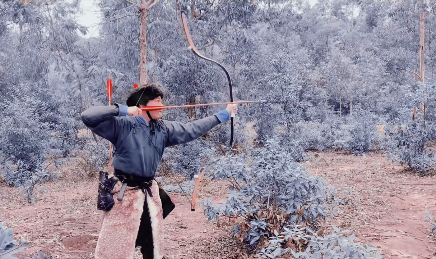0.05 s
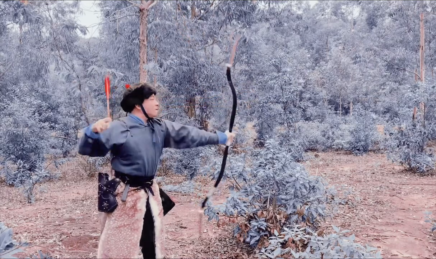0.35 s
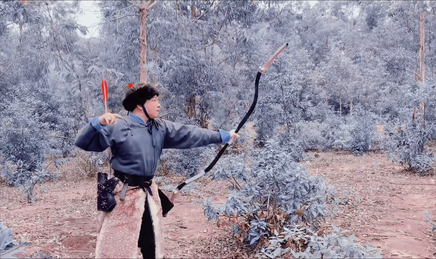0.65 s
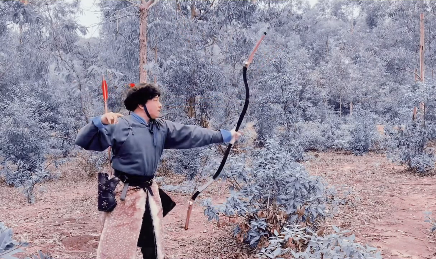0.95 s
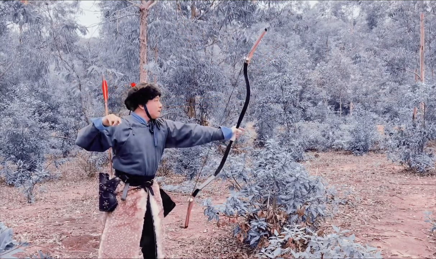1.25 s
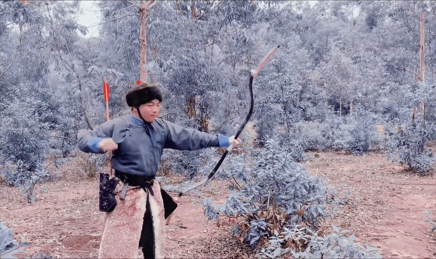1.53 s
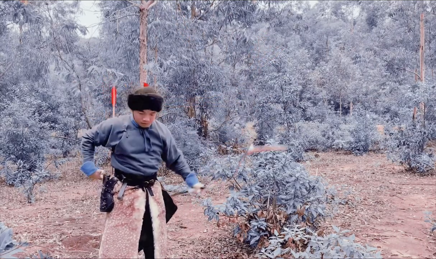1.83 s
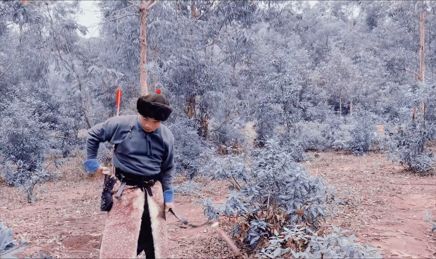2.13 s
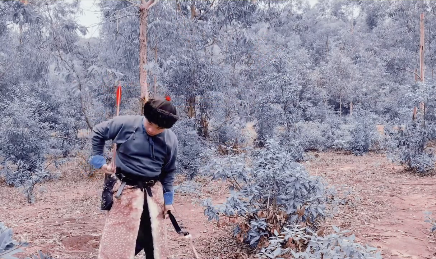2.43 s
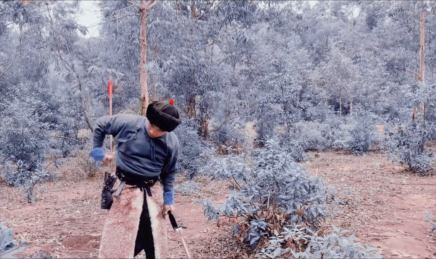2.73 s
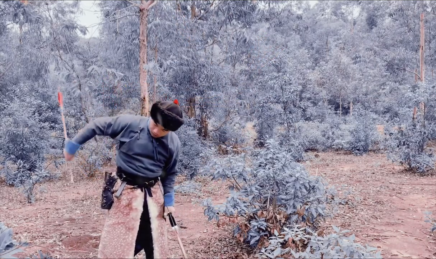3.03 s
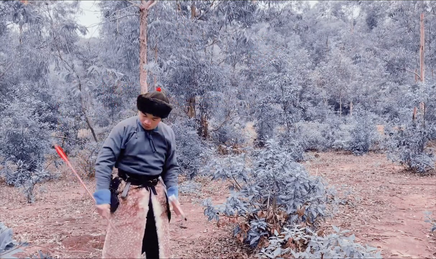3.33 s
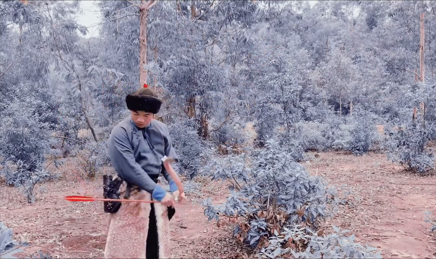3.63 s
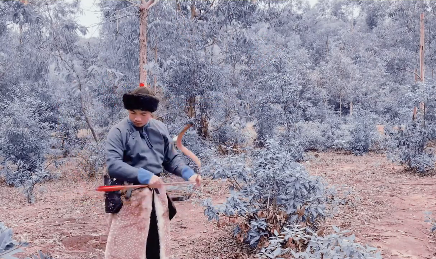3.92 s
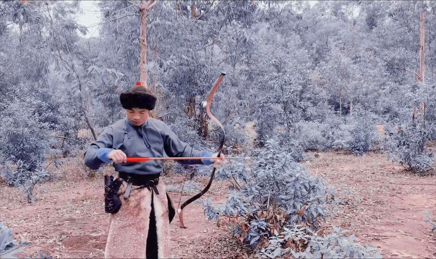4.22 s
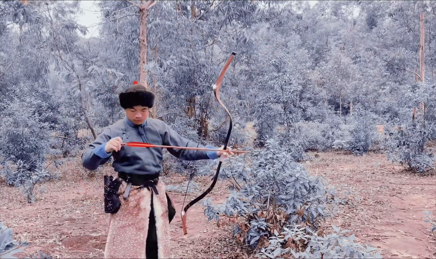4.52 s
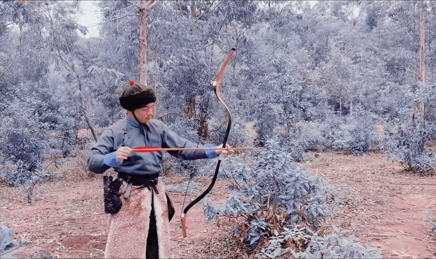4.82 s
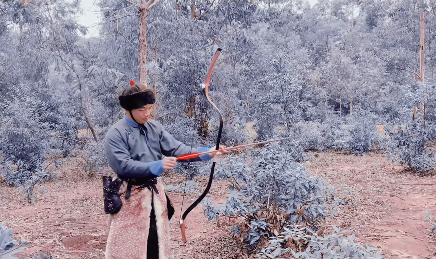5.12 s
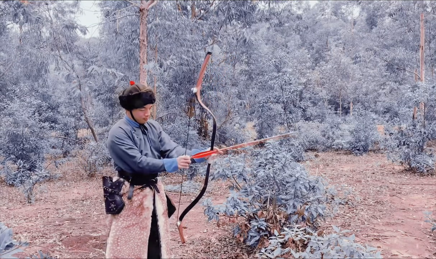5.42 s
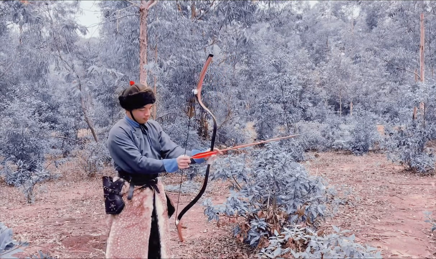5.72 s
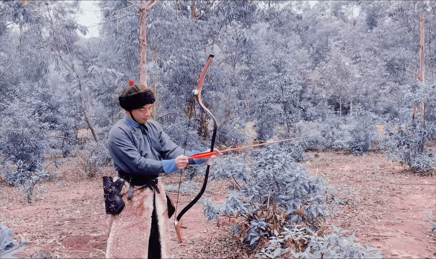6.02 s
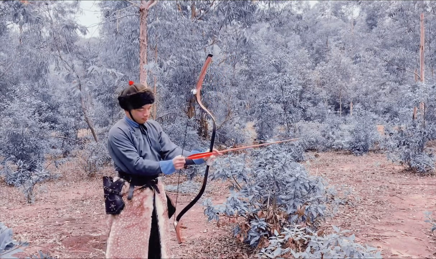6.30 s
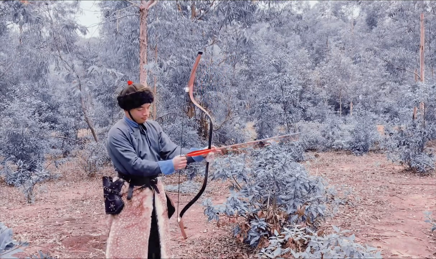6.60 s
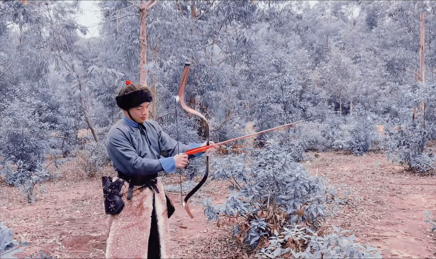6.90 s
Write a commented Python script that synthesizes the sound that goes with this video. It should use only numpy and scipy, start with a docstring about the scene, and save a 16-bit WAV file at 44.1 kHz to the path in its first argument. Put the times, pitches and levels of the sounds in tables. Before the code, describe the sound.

A heavy bow releases with a loud, sharp string crack, and half a second later the arrow thuds into a target. After some faint clothing scuffs, the next arrow is drawn from a quiver and slid along the bow with light taps, scrapes and tiny squeaks. The bow sounds fairly near the microphone, with a short forest echo, a low outdoor rumble and one barely audible bird.

```python
"""A heavy bow shot in a forest clearing: the string drives the arrow, cracks taut and rings the limbs.
Half a second later the point tears into the target, which thuds and booms on its stand.
The archer pulls the next arrow from the quiver, slides it along the bow and fingers the feathers:
taps ring the shaft, friction hisses and squeaks. The trees scatter all of this back.
Underneath: a low outdoor rumble, a faint 3 kHz blip between shot and hit, and one far bird."""
import sys
import numpy as np
from scipy import signal
from scipy.fft import rfft, irfft, next_fast_len
from scipy.io import wavfile
from scipy.ndimage import uniform_filter1d

SR = 44100
rng = np.random.default_rng(int(sys.argv[2]) if len(sys.argv) > 2 else 0)


def inscribe(sig):
    """Save sig as 16-bit PCM at rate SR to the path in sys.argv[1].

    A 1-D sig is mono; a 2-D sig holds one channel per row.
    Samples are clipped to [-1, 1] before scaling.
    """
    pcm = np.round(np.clip(np.atleast_2d(sig).T, -1, 1) * 32767)
    wavfile.write(sys.argv[1], SR, pcm.astype(np.int16))


N = 310949
TIME_S = np.arange(N) / SR
LOOSE_S, TAUT_S, IMPACT_S, QUIVER_S = .2138, .2378, .7153, 3.294

# Noise spectra. Each row: frequency in Hz, relative level in dB.
AIR_SPECTRUM = [(15, -55.5), (25, -24), (35, -9.5), (52, 1), (75, 0), (134, -12), (256, -27), (420, -35),
                (720, -35.5), (1040, -41.5), (1300, -50), (2900, -55.5), (6700, -63), (11400, -59.5),
                (16000, -74)]
CREAK_SPECTRUM = [(1500, -35), (2700, -2), (3200, 0), (4500, -7), (7000, -20), (16000, -30)]
THRUST_SPECTRUM = [(88, -40), (250, -12), (620, -3), (1050, -3.5), (1480, -17), (2200, -11.5), (2550, -15),
                   (3500, -10.5), (5400, -22), (7400, -18), (12000, -20), (16000, -21)]
SLAP_SPECTRUM = [(88, -29), (160, -8.5), (260, -2.5), (430, -14), (650, -5.5), (1100, -9), (2100, -2.5),
                 (2550, -7.5), (3450, 0.5), (4300, -3), (4700, -10), (6900, -8), (9500, -15), (12300, -5.5),
                 (15500, -12.5)]
TEAR_SPECTRUM = [(350, -10.5), (600, 3), (1000, -4.5), (1850, -20.5), (3600, -15), (4800, -24), (6200, -21),
                 (8500, -25.5), (12000, -28), (16000, -36)]
SLEEVE_SPECTRUM = [(590, -57), (1000, -4.5), (1680, -6.5), (2890, -7.5), (3630, -27), (7210, -18),
                   (9160, -30), (12000, -15.5), (15600, -46), (22000, -120)]
TAP_SPECTRUM = [(150, -33), (380, 9), (650, -7), (1380, -1.5), (2000, -5), (2750, -5.5), (3600, -13.5),
                (4500, -15), (8000, -21), (16000, -31.5)]
SHUFFLE_SPECTRUM = [(150, -13), (330, 4), (650, 1), (1000, -9), (1500, -20.5), (4000, -40.5)]
BRUSH_SPECTRUM = [(1500, -23), (3000, -10.5), (5000, -8), (7000, 4.5), (8500, -1), (11500, 5.5),
                  (13000, -0.5), (15500, 0.5)]
PULL_SPECTRUM = [(700, -15), (1300, -8.5), (2200, -1), (3000, -1), (4400, -0.5), (5100, -14), (8000, -26),
                 (11000, -37)]
RUB_SPECTRUM = [(200, -4), (400, 1.5), (750, 1.5), (1200, 2.5), (2200, 0), (3200, -4.5), (4500, -7.5),
                (6000, -26), (9000, -24)]
FEATHER_SPECTRUM = [(1500, -45), (2300, -13), (3000, -4), (5000, -2.5), (7500, -6), (11000, 0.5),
                    (13000, -5.5), (15500, -4.5)]

# Struck modes. Each row: frequency in Hz, relative level in dB, T60 in seconds.
BOW_MODES = [(160, -41.5, 0.51), (249, -22, 0.066), (651, -28.5, 0.15), (848, -30, .1), (1122, -32.5, .08),
             (1284, -30, 0.065), (2300, -24, .03), (2665, -27, .05), (3380, -21, 0.043), (3562, -23, .045),
             (4272, -20, 0.044)]  # limbs and taut string
TARGET_MODES = [(112.4, -22.5, 0.17), (172, -20.5, 0.14), (226, -22, 0.11), (271, -24, 0.1),
                (385, -28, 0.113), (726, -36, 0.043), (986, -39, 0.072)]  # target and stand
QUIVER_MODES = [(1120, -60, 0.044), (1341, -50, 0.054), (1565, -52, .04)]
# Shaft bending modes. Each row: frequency in Hz, width in Hz, relative level in dB.
SHAFT_MODES = [(436, 140, -9.5), (966, 120, -4.5), (1353, 66, 3), (1813, 50, -1.5), (2194, 86, -6),
               (2805, 24, 0), (3040, 81, -14.5), (3810, 58, -14), (4605, 54, -20)]

# String and arrow on the bow. Each row: start in seconds, relative level in dB, T60 in seconds,
# treble gain in dB.
SLAPS = [(0.2184, -24, 0.008, 2), (0.233, -21, 0.037, 2), (0.2347, -18, .025, 0), (0.2374, -9, 0.01, -3),
         (0.2385, -12.5, 0.0085, 6), (0.2398, -8.5, 0.01, -3), (0.2429, -13, 0.0071, 1),
         (.2452, -19, 0.05, -4.5), (0.2486, -22, 0.0091, 9.5)]
# Arrow on quiver, fingers and bow. Each row: start in seconds, relative level in dB, treble gain in dB.
ARROW_TAPS = [(1.667, -63, 0), (2.014, -49.5, -12), (3.012, -67, 9), (3.293, -42.5, 7), (3.382, -52, -4),
              (3.691, -36, 3.5), (3.831, -44.5, 1.5), (4.459, -54.5, 2), (4.767, -52.5, 0),
              (4.854, -43, -6), (5.063, -42, 9.5), (5.073, -42.5, 9), (5.255, -43, 9.5),
              (5.297, -43.5, -11), (5.507, -59.5, 1), (6.267, -58, 1.5), (6.647, -53, 6.5),
              (6.81, -52.5, -6)]

# Gestures. Each row: start and length in seconds, relative level in dB, attack and release in seconds,
# sag in dB per second.
SLEEVE_SWING = [(1.42, .82, -79.5, 0.27, .18, 1)]
BIRD_WHISTLE = [(3.17, .49, -83, 0.088, .12, 8)]
HAND_STROKES = [(3.78, 0.27, -63, 0.11, 0.021, 0.5), (4.013, 0.36, -47.5, 0.013, 0.086, 59),
                (4.8, 0.548, -59.5, 0.23, 0.023, 8)]  # feel along the shaft, pull, push to the string
QUICK_PULL = [(4.033, 0.25, -50, 0.018, .07, 75)]
BOW_RUBS = [(4.775, 0.486, -54.5, 0.19, .05, 8), (5.262, 0.079, -58.5, 0.026, .02, 0)]  # slide, then a last catch
FEATHER_STROKE = [(5.777, 0.24, -64, .012, 0.047, -1)]

# Noise swells. Each row: centre in seconds, relative level in dB, half length in seconds.
RUSTLE_FLICKS = [(0.099, -71, 0.008), (1.76, -77, .009), (3.297, -76, .016), (3.89, -65, 0.0092),
                 (4.352, -65, .0031), (4.635, -74, .0025), (5.314, -56, .011), (5.428, -71, 0.013),
                 (5.559, -77, .012), (5.79, -65, 0.0049), (6.1, -69, 0.0068), (6.597, -79.5, .011),
                 (6.697, -79, .008), (6.974, -73.5, .0086), (7.035, -72.5, 0.0083)]
STRING_CREAK = (.103, -66, .003)  # one bare row
SCUFFS = [(1.68, -66.5, 0.014), (1.769, -62.5, 0.02), (2.02, -63, 0.026), (2.585, -69.5, 0.057),
          (2.763, -66, 0.0089), (5.457, -70, 0.027), (5.675, -68, 0.022), (6.271, -62, 0.013),
          (6.657, -61, 0.016), (6.806, -71.5, 0.034)]
# Tone swells. Each row: centre in seconds, pitch in Hz, relative level in dB, half length in seconds.
FAINT_TONES = [(.561, 2980, -61.5, 0.011), (1.057, 3755, -83, 0.018), (1.828, 3350, -83, .025),
               (1.98, 3090, -79.5, 0.025), (2.79, 3480, -86, .027), (2.91, 2920, -85.5, .04)]  # first row: blip between shot and hit; the rest: bird chirps
FINGER_SQUEAKS = [(4.995, 1170, -48.5, 0.008), (5.022, 1940, -54, 0.0087), (5.092, 1160, -58, .0073),
                  (5.116, 2900, -59.5, 0.009), (5.163, 1520, -50, 0.0098), (5.9, 3050, -53.5, 0.0017)]

# Tree echo spectrum. Each row: frequency in Hz, gain in dB.
ECHO_SPECTRUM = [(100, -22), (250, -23.5), (700, -24), (1500, -21), (3000, -19), (6000, -14.5),
                 (11000, -19), (16000, -19.5)]
# Tree echo decay. Each row: frequency in Hz, T60 in seconds.
ECHO_T60_S = [(100, .55), (700, .55), (2000, .7), (4000, .68), (7000, .56), (12000, .48), (16000, .42)]
# Output stop bands. Each row: centre in Hz, width in Hz.
NOTCHES_HZ = [(9150, 1000), (13580, 900)]


def from_db(db):
    """Decibels to gain."""
    return 10 ** (np.asarray(db) / 20)


def unit_rms(x):
    """Scale to unit power."""
    return x / np.sqrt(np.mean(x ** 2) + 1e-20)


def at_hz(table, hz):
    """Interpolate on a log-frequency axis."""
    table = np.array(table)
    return np.interp(np.log(np.maximum(hz, 1)), np.log(table[:, 0]), table[:, 1])


def colour(x, spectrum):
    """Filter by a spectrum; RMS 1."""
    half_size = next_fast_len(N // 2 + 1)
    gain = from_db(at_hz(spectrum, np.linspace(0, SR / 2, half_size + 1)))
    return unit_rms(irfft(rfft(x, 2 * half_size) * gain)[:N])


def noise(spectrum):
    """Coloured noise; RMS 1."""
    return colour(rng.standard_normal(N), spectrum)


def steady(x, span_s):
    """Flatten short-term power."""
    power = uniform_filter1d(x * x, int(span_s * SR))
    return x / np.sqrt(np.maximum(power, 1e-12))


def split(x, edge_hz):
    """Parts below and above an edge."""
    low = signal.sosfiltfilt(signal.butter(2, edge_hz, fs=SR, output="sos"), x)
    return low, x - low


def butter(x, order, edges_hz, kind):
    """Causal Butterworth filter."""
    return signal.sosfilt(signal.butter(order, edges_hz, kind, fs=SR, output="sos"), x)


def drift(rate_hz):
    """Random wander, spread about 1."""
    return np.interp(TIME_S * rate_hz, np.arange(N // 10), rng.standard_normal(N // 10))


def friction(grain_db):
    """Grainy white noise: fibres catch and let go."""
    return unit_rms(rng.standard_normal(N) * from_db(grain_db * (drift(600) + drift(90)) / 2))


def gesture_gain(gestures):
    """Envelopes that rise, sag steadily and stop."""
    gain = 0
    for start_s, length_s, db, attack_s, release_s, sag_db_per_s in gestures:
        age_s = TIME_S - start_s
        gate = np.clip(age_s / attack_s, 0, 1) * np.clip((length_s - age_s) / release_s, 0, 1)
        gain += gate * from_db(db - sag_db_per_s * np.clip(age_s - attack_s, 0, length_s))
    return gain


def decay(start_s, t60_s):
    """Instant onset, exponential fall."""
    age_s = TIME_S - start_s
    return (age_s >= 0) * from_db(-60 * np.clip(age_s / t60_s, 0, 4))


def swell(centre_s, db, half_s):
    """Gaussian envelope."""
    return from_db(db) * np.exp(-np.minimum(((TIME_S - centre_s) / half_s) ** 2 / 2, 50))


def struck(start_s, modes):
    """Damped sines from one blow."""
    return sum(from_db(db) * decay(start_s, t60_s) * np.sin(2 * np.pi * hz * (TIME_S - start_s))
               for hz, db, t60_s in modes)


def running_phase(start_s, hz):
    """Integrate pitch to radians."""
    return 2 * np.pi * np.cumsum(hz * (TIME_S >= start_s)) / SR


def sinking_phase(start_s, from_hz, to_hz, sink_s):
    """Phase of an exponentially settling pitch."""
    age_s = np.maximum(TIME_S - start_s, 0)
    return running_phase(start_s, to_hz + (from_hz - to_hz) * np.exp(-age_s / sink_s))


def blurred(phase, rate_hz):
    """Tone spread to a narrow band by wandering gain and phase."""
    return drift(rate_hz) * np.sin(phase) + drift(rate_hz) * np.cos(phase)


def tone_swell(centre_s, hz, db, half_s):
    """Brief blurred tone."""
    return swell(centre_s, db, half_s) * blurred(2 * np.pi * hz * TIME_S, rate_hz=350)


def outdoor_air(level_db=-49.5, waver_db=1.5):
    """Rumble and faint hush; each lower band wavers on its own."""
    rest, wavering = noise(AIR_SPECTRUM), 0
    for edge_hz in (200, 400, 800, 1600, 3200):
        band, rest = split(rest, edge_hz)
        wavering += band * from_db(waver_db * drift(rate_hz=9))
    return from_db(level_db) * (wavering + rest)


def rustles():
    """Cloth and feather barbs give grainy hiss."""
    flicks = sum(swell(*row) for row in RUSTLE_FLICKS) * colour(friction(grain_db=1.5), BRUSH_SPECTRUM)
    sleeve = gesture_gain(SLEEVE_SWING) * colour(friction(grain_db=5), SLEEVE_SPECTRUM)
    feathers = gesture_gain(FEATHER_STROKE) * colour(friction(grain_db=7), FEATHER_SPECTRUM)
    return flicks + sleeve + feathers


def string_creak():
    """Fingers scrape the drawn string."""
    return swell(*STRING_CREAK) * noise(CREAK_SPECTRUM)


def string_thrust(level_db=-27.5, attack_s=.005, hold_s=.031, t60_s=.125):
    """The string drives the arrow past the grip: a rush that holds, then dies."""
    age_s = TIME_S - LOOSE_S
    envelope = np.clip(age_s / attack_s, 0, 1) * from_db(-60 * np.clip((age_s - hold_s) / t60_s, 0, 2))
    return from_db(level_db) * envelope * steady(noise(THRUST_SPECTRUM), span_s=.008)


def string_crack(slap_db=-1, ring_db=-.5):
    """The string snaps taut in a cluster of slaps; the limbs ring on."""
    low_power = high_power = 0
    for start_s, db, t60_s, treble_db in SLAPS:
        envelope = from_db(db) * decay(start_s, t60_s)
        low_power += envelope ** 2
        high_power += (envelope * from_db(treble_db)) ** 2
    low, high = split(steady(noise(SLAP_SPECTRUM), span_s=.002), edge_hz=4900)
    slaps = np.sqrt(low_power) * low + np.sqrt(high_power) * high
    return from_db(slap_db) * slaps + from_db(ring_db) * struck(TAUT_S, BOW_MODES)


def forest_echoes(x, build_s=.0056):
    """Dense scatter off trunks and leaves; each band has its own decay."""
    edges_hz = np.geomspace(70, 17000, 13)
    age_s = TIME_S[:SR]
    white = rng.standard_normal((2, SR))
    response = 0
    for k, (low_hz, high_hz) in enumerate(zip(edges_hz, edges_hz[1:])):
        hz = np.sqrt(low_hz * high_hz)
        fade = (1 - np.exp(-age_s / build_s)) * from_db(-60 * age_s / at_hz(ECHO_T60_S, hz))
        band = butter(white[k % 2], 2, [low_hz, high_hz], "band")
        response += from_db(at_hz(ECHO_SPECTRUM, hz)) * band * fade / np.linalg.norm(fade)
    return signal.fftconvolve(x, response)[:N]


def faint_blip():
    """Short, faint 3 kHz blip between the shot and the target hit."""
    return tone_swell(*FAINT_TONES[0])


def target_tear(level_db=-25, entry_s=.0044):
    """The point tears in: a short noise burst."""
    envelope = np.clip((TIME_S - IMPACT_S) / entry_s, 0, 1) * decay(IMPACT_S, t60_s=.061)
    return from_db(level_db) * envelope * steady(noise(TEAR_SPECTRUM), span_s=.0032)


def target_thud(punch_db=-18, peak_s=.011, sharpness=2.9, stand_db=-4.5, give_s=.0085):
    """Pitch falls as more of the target moves; then the stand booms."""
    progress = np.clip((TIME_S - IMPACT_S) / peak_s, 0, 20)
    envelope = (progress * np.exp(1 - progress)) ** sharpness
    punch = envelope * np.sin(sinking_phase(IMPACT_S, from_hz=1445, to_hz=192, sink_s=.003197))
    return from_db(punch_db) * punch + from_db(stand_db) * struck(IMPACT_S + give_s, TARGET_MODES)


def far_bird(whistle_hz=4500, fall_hz_per_s=1450, flutter_db=3):
    """Chirps and a falling whistle, blurred by many paths through the leaves."""
    chirps = sum(tone_swell(*row) for row in FAINT_TONES[1:])
    start_s = BIRD_WHISTLE[0][0]
    phase = running_phase(start_s, whistle_hz - fall_hz_per_s * (TIME_S - start_s))
    whistle = gesture_gain(BIRD_WHISTLE) * blurred(phase, rate_hz=260)
    return chirps + whistle * from_db(flutter_db * drift(rate_hz=25))


def shaft_ring(force):
    """Force through the arrow's bending modes, alternating in sign."""
    ring = 0
    for k, (hz, width_hz, db) in enumerate(SHAFT_MODES):
        radius = np.exp(-np.pi * width_hz / SR)
        feedback = [1, -2 * radius * np.cos(2 * np.pi * hz / SR), radius ** 2]
        gain = (-1) ** k * from_db(db) * (1 - radius ** 2) / 2
        ring += gain * signal.lfilter([1, 0, -1], feedback, force + 1e-18)
    return ring


def arrow_taps(click_db=-9, ring_db=7.5, t60_s=.054):
    """Each touch rattles briefly and rings the shaft."""
    force = sum(from_db(db) * decay(start_s, t60_s) for start_s, db, _ in ARROW_TAPS)
    bright = sum(from_db(db + treble_db) * decay(start_s, t60_s) for start_s, db, treble_db in ARROW_TAPS)
    low, high = split(steady(noise(TAP_SPECTRUM), span_s=.0021), edge_hz=2160)
    ring = shaft_ring(force * rng.standard_normal(N))
    return from_db(click_db) * (force * low + bright * high) + from_db(ring_db) * ring


def shuffles():
    """Robe and soles scuff as the archer shifts his weight."""
    return sum(swell(*row) for row in SCUFFS) * colour(friction(grain_db=-.5), SHUFFLE_SPECTRUM)


def quiver_ring():
    """The hollow quiver rings as the arrow leaves."""
    return struck(QUIVER_S, QUIVER_MODES)


def brushing(strokes):
    """Skin and sleeve hiss along the shaft."""
    return gesture_gain(strokes) * colour(friction(grain_db=3.5), BRUSH_SPECTRUM)


def quick_pull(tone_db=-.5, scrape_db=-2.5):
    """Shaft grain passes the fingers ever slower; a falling tone melts into scraping."""
    effort = gesture_gain(QUICK_PULL)
    phase = sinking_phase(QUICK_PULL[0][0], from_hz=3150, to_hz=1100, sink_s=.075)
    tone = effort / effort.max() * steady(blurred(phase, rate_hz=420), span_s=.02)
    scrape = colour(friction(grain_db=2.5), PULL_SPECTRUM)
    return effort * (from_db(tone_db) * tone + from_db(scrape_db) * scrape)


def shaft_slide(rub_db=-1, ring_db=-19, flicker_db=5.5):
    """The shaft catches and slips along the bow; bands flicker with the contact."""
    edges_hz = np.linspace(190, 6270, 17)
    sources = [friction(grain_db=2), friction(grain_db=2)]
    grains = 0
    for k, band_hz in enumerate(zip(edges_hz, edges_hz[1:])):
        grains += butter(sources[k % 2], 2, band_hz, "band") * from_db(flicker_db * drift(rate_hz=40))
    rub = from_db(rub_db) * colour(grains, RUB_SPECTRUM)
    ring = from_db(ring_db) * unit_rms(shaft_ring(grains))
    return gesture_gain(BOW_RUBS) * (rub + ring)


def finger_squeaks(wander_hz=49.66):
    """Fingers stick and slip on the shaft at an unsteady pitch."""
    wobble = running_phase(0, wander_hz * drift(rate_hz=400))
    return sum(swell(centre_s, db, half_s) * np.sin(2 * np.pi * hz * TIME_S + wobble)
               for centre_s, hz, db, half_s in FINGER_SQUEAKS)


def ground_comb(x, gain=.76, delay_s=.00264):
    """Direct sound plus its bounce off the ground."""
    bounce = np.interp(TIME_S - delay_s, TIME_S, x)
    return (x + gain * bounce) / np.sqrt(1 + gain ** 2)


def scene():
    """Bow, target and handling share the forest; the tear is wettest."""
    shot = string_crack() + string_thrust()
    tear, thud = target_tear(), target_thud()
    *pulls, push = HAND_STROKES
    drawing_out = arrow_taps() + quiver_ring() + brushing(pulls) + quick_pull()
    nocking = ground_comb(shaft_slide() + brushing([push]) + rustles())
    handling = string_creak() + drawing_out + nocking + finger_squeaks() + shuffles()
    echoes = forest_echoes(shot + from_db(11) * tear + thud + handling)
    return (shot + tear + thud + handling + echoes + faint_blip() + far_bird() + outdoor_air())[None]


def record(dry):
    """Bass cut, two treble notches, steep top edge."""
    bass_cut_hz, top_hz = 38, 15800
    x = butter(dry, 4, bass_cut_hz, "high")
    for hz, width_hz in NOTCHES_HZ:
        x = butter(x, 3, [hz - width_hz / 2, hz + width_hz / 2], "bandstop")
    return signal.sosfilt(signal.ellip(10, .3, 80, top_hz, fs=SR, output="sos"), x)


dry = scene()
out = record(dry)
inscribe(out)
```